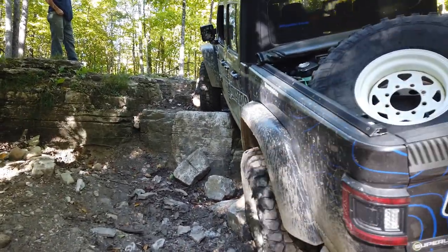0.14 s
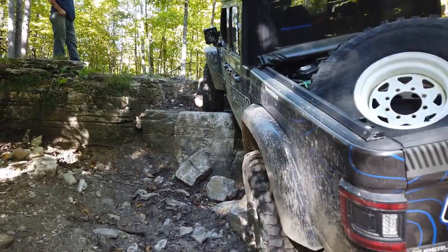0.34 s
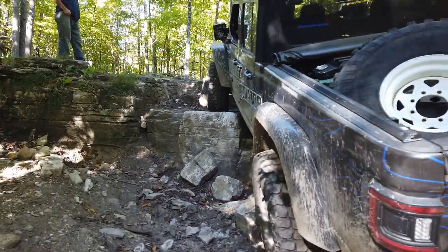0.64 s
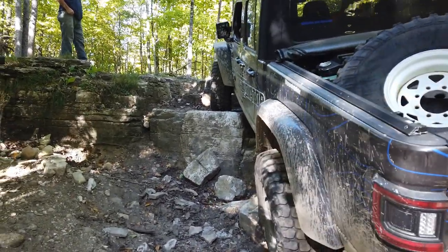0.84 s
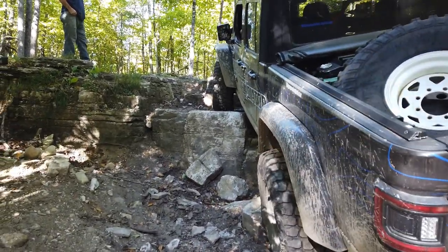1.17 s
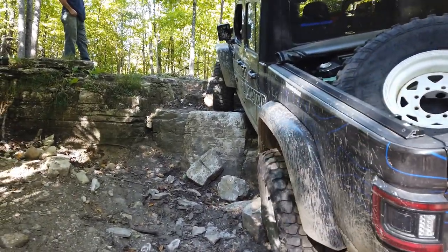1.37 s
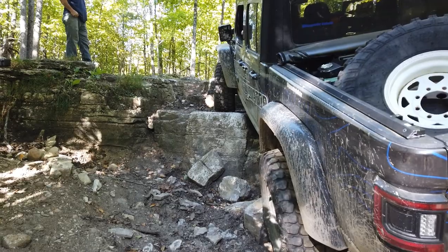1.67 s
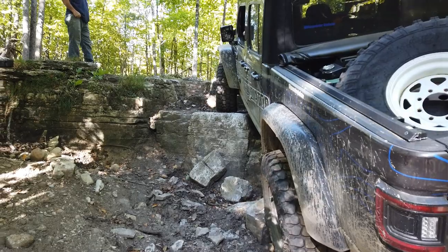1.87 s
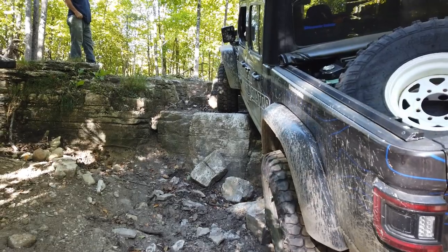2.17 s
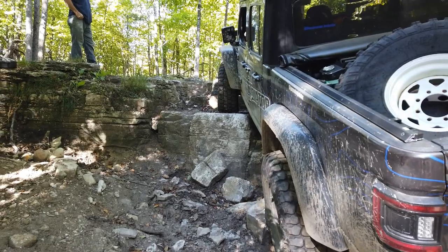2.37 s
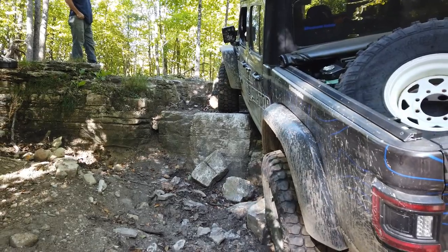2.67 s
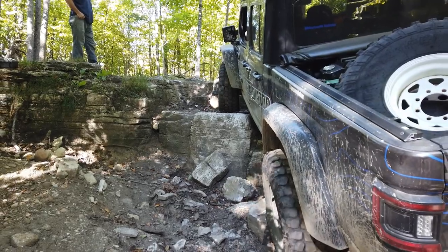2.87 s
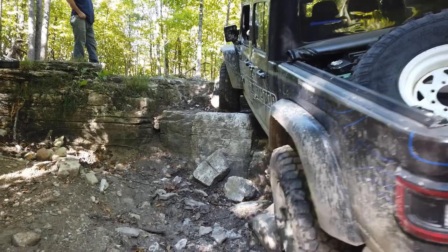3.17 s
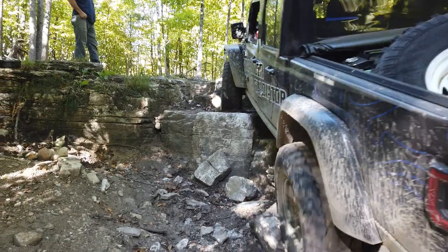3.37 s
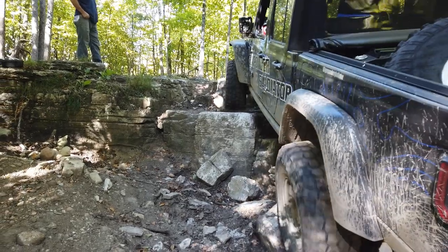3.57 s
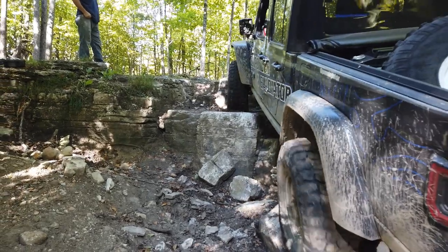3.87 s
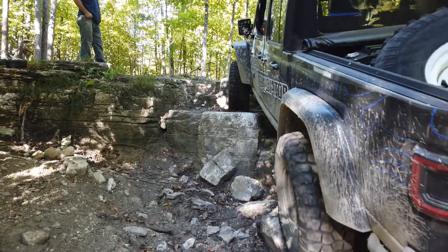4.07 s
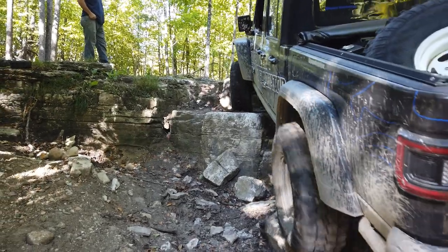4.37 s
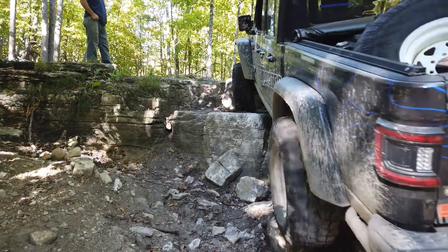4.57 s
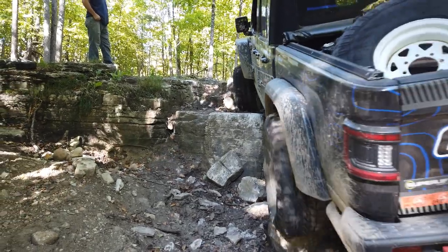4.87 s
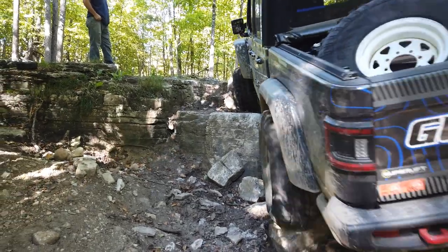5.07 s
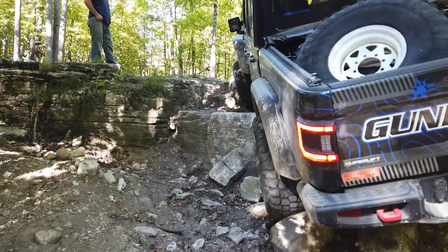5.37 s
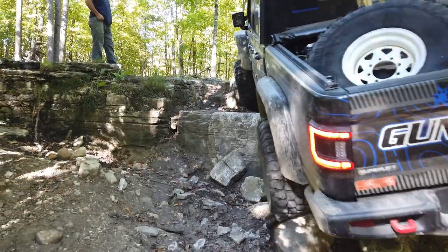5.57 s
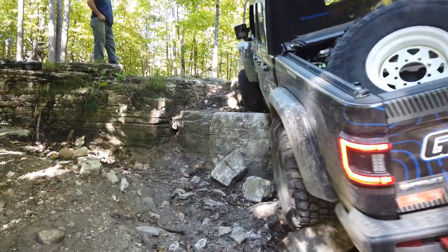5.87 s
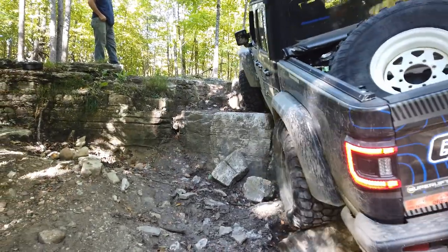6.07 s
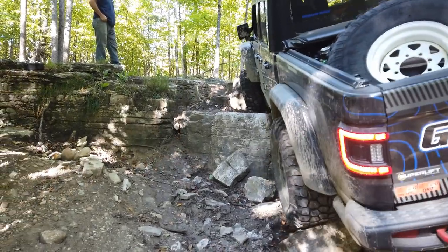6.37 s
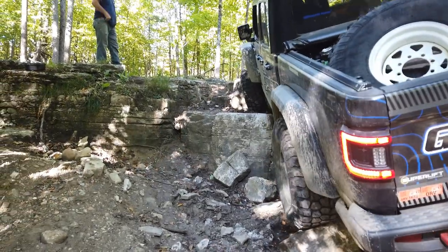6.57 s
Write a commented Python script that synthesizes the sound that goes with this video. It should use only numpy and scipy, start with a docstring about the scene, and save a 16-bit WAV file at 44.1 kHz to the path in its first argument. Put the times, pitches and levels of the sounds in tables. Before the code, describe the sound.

Outdoors among trees, close behind a truck on a rock ledge, with faint steady forest air beneath. In the first 0.8 seconds stones knock, click and crunch under the tyres over a low idle. The exhaust swells quickly, peaking around 0.8 to 1.2 seconds with metallic chatter, then sinks to a slow throb near 1.8. It pulls up again, ticking brightly around 2.3 to 2.6, and grows loud by 2.7. From about 2.9 the tyres slip and grind, scattering grit and dirt; revs climb to a raspy growl through 3.9, with body thuds near 3.5, ease around 4.5 amid stone cracks and tiny squeaks, then surge again at 5 to 5.3. At 5.4 the throttle closes; loudness drops, a thud lands near 5.75, and the uneven engine winds down with rubbing brakes, a faint thin whine near 6.2 and last stones crunching until 6.7.

```python
"""Truck climbing a rock ledge

A six-cylinder truck crawls up a rock ledge on a wooded trail, heard from close behind, then rolls back.
The exhaust, a sum of engine orders shaped by the pipe, swells from idle twice; filtered noise and ringing
modes add its rasp, chatter and pinging. On the long second push the tyres spin, grind on stone and spray
dirt, all as coloured random clicks. Stones crunch as noise bursts; knocks, ticks and brief squeaks ring as
decaying modes, the body thuds, the brakes rub and whine as the throttle closes, and steady noise forms
the forest."""
import sys
import numpy as np
from scipy import signal
from scipy.fft import rfft, irfft
from scipy.io import wavfile
from scipy.ndimage import uniform_filter1d

SR = 44100
rng = np.random.default_rng(int(sys.argv[2]) if len(sys.argv) > 2 else 0)


def put_to_file(sound):
    """Save the sound as 16-bit audio at rate SR, in the file named by the first command-line argument."""
    columns = np.atleast_2d(sound).T  # one column per channel
    safe = np.clip(columns, -1, 1)
    whole_steps = np.round(safe * 32767)
    wavfile.write(sys.argv[1], SR, whole_steps.astype(np.int16))


N = 296352
TIME = np.arange(N) / SR  # s

# Spectrum of still air and leaves: frequency_hz, relative_level_db
FOREST_COLOUR = [(500, -7), (680, 7.5), (1000, -3), (1800, 0), (2600, 3), (3500, -7.5), (7000, -10),
                 (10400, -13.5), (12000, -45), (16000, -32.5)]
# Likeness of left and right: frequency_hz, correlation (no unit)
LEFT_RIGHT_LIKENESS = [(30, 0.95), (300, 0.95), (700, 0.94), (1400, 0.83), (2800, 0.64), (5000, 0.067),
                       (16000, 0.22)]
# Stones crunching under the wheels: start_s, level_db (before a common gain), centre_hz, length_s
STONE_CRUNCHES = [(0.088, -33, 950, 0.016), (0.355, -42, 1720, 0.023), (0.433, -45, 1490, 0.024),
                  (0.519, -47, 1190, 0.02), (0.563, -39.5, 1650, 0.022), (0.600, -39, 2400, 0.013),
                  (0.627, -44, 2040, 0.015), (0.753, -41, 950, 0.014), (1.483, -59, 2000, 0.0064),
                  (1.6378, -51, 1570, 0.0074), (2.614, -47, 1780, 0.023), (2.969, -44, 720, 0.047),
                  (2.992, -33.5, 603, 0.075), (3.144, -40, 1610, 0.031), (3.207, -39.5, 666, 0.044),
                  (3.431, -37.5, 1660, 0.014), (3.504, -40, 1540, 0.032), (3.54, -39.5, 1680, 0.027),
                  (3.672, -41, 1410, 0.032), (3.724, -42.5, 2150, 0.066), (3.92, -43, 1460, 0.014),
                  (4.415, -33, 452, 0.047), (4.643, -35.5, 765, 0.042), (4.648, -47, 1980, 0.026),
                  (4.723, -36.5, 1200, 0.028), (4.83, -40, 1540, 0.011), (4.879, -41, 960, 0.069),
                  (5.408, -45, 1590, 0.024), (5.48, -45.5, 1730, 0.083), (5.568, -38.5, 2020, 0.026),
                  (5.703, -42.5, 1900, 0.032), (6.017, -40, 715, 0.044), (6.023, -41, 2020, 0.032),
                  (6.086, -44, 1140, 0.018), (6.181, -43.5, 2070, 0.025), (6.384, -52, 2000, 0.025),
                  (6.456, -38.5, 370, 0.029), (6.604, -59, 2000, 0.054), (6.665, -52, 1070, 0.022)]
# Short ringing sounds: stone knocks, pebble ticks, brief squeaks near 3.3 kHz and the bright start of a hiss:
# start_s, peak_db, pitch_hz, decay_s
SHORT_RINGS = [(0.0335, -26, 1440, 0.0051), (0.0345, -20, 840, 0.0017), (0.042, -20.5, 1000, 0.0022),
               (0.078, -21, 1206, 0.0037), (0.0852, -15.5, 932, 0.003), (0.192, -30, 1990, 0.0013),
               (0.247, -32.5, 1950, 0.0011), (0.5623, -17, 1580, .0007), (0.5996, -22, 2150, 0.00077),
               (0.604, -26.5, 2640, 0.0058), (0.627, -30, 2090, 0.0011), (0.653, -40, 5400, .003),
               (0.7363, -30.5, 1930, 0.0018), (0.753, -34, 1200, 0.0014), (3.145, -25.5, 1700, 0.0015),
               (3.207, -20.5, 674, 0.0038), (3.433, -41, 7950, .002), (3.442, -25.5, 1540, .002),
               (3.852, -42, 7800, .004), (3.894, -26.5, 1880, 0.006), (4.16, -46, 9900, 0.0032),
               (4.301, -48, 8300, 0.0032), (4.532, -38.5, 3210, 0.016), (4.576, -41, 3310, 0.007),
               (4.655, -38, 1300, 0.0019), (4.737, -26, 1310, 0.0062), (4.836, -39, 3300, 0.0071),
               (4.9945, -23.5, 1500, .001), (5.476, -36, 4900, 0.004), (5.49, -34, 5370, 0.0024),
               (5.575, -36, 2070, 0.0026), (6.025, -35, 1500, 0.0013)]
# Modes of each short ring: multiple of its pitch (no unit), relative_level_db
RING_MODES = [(.76, -1), (0.999, 3.5), (1.65, -15), (2.05, -12)]
# Axle and body thud as a wheel drops: start_s, peak_db, pitch_hz, decay_s
BODY_THUDS = [(3.48, -18.5, 225, 0.0058), (3.636, -18.5, 220, 0.0081), (3.655, -20, 65.4, 0.011),
              (5.722, -25, 48, 0.036), (5.782, -19, 147, 0.0082), (6.022, -30, 250, 0.0033)]
# A tyre rolls hard or spins on the rock: start_s, attack_s, length_s, grinding_db, spray_db, rumble_db
TYRE_SLIPS = [(0, 0.012, 0.093, -46.5, -66.5, -29), (0.108, 0.025, .16, -46.5, -64, -41),
              (0.315, 0.0067, 0.063, -44, -48.5, -31), (0.547, .005, 0.15, -49, -55, -39),
              (2.884, 0.13, 3.37, -46.5, -62.5, -35), (3.037, 0.08, 0.44, -44, -57.5, -30),
              (3.419, 0.0072, .02, -37, -49.5, -27.5), (3.487, 0.015, 0.44, -38.5, -52, -31),
              (3.66, 0.061, 0.1, -40, -48, -37), (4.484, 0.031, 0.059, -38.5, -52.5, -52),
              (4.602, 0.031, 0.17, -39, -54.5, -53), (4.776, 1, 0.55, -47, -49, -38),
              (5.463, 0.025, 0.012, -39, -43, -56), (5.526, 0.036, 0.04, -51, -49.5, -49),
              (5.691, 0.015, 0.085, -41.5, -49, -35), (5.847, 0.045, 0.24, -41, -52.5, -44),
              (6.102, 0.052, 0.094, -57, -56.5, -34), (6.335, 0.0079, 0.051, -48, -60.5, -30.5)]
# Spectrum of tread grinding on rock: frequency_hz, relative_level_db
GRIND_COLOUR = [(200, -36.5), (390, 12.5), (470, 6), (700, 4.5), (1000, -4), (1300, -2.5), (1700, -6.5),
                (2300, -2.5), (2850, -9), (3600, -23.5), (6000, -40), (12000, -46.5)]
# Spectrum of flying dirt: frequency_hz, relative_level_db
SPRAY_COLOUR = [(1500, -17.5), (3300, -3), (4400, 1), (5400, 3), (7000, -0.5), (9000, 0), (10400, 3.5),
                (11400, -10), (13000, -14.5), (15000, -7), (16000, -33)]
# Spectrum of tread and chassis rumble: frequency_hz, relative_level_db
RUMBLE_COLOUR = [(15, -14), (30, 0.5), (50, 7.5), (80, -0.5), (110, -7.5), (150, -5), (185, -3.5),
                 (220, -6), (265, -10.5), (290, -1.5), (325, -12.5), (400, -32), (480, -32.5), (900, -78)]
# Spectrum of ticking under load: frequency_hz, relative_level_db
PING_COLOUR = [(1800, -28), (2500, 1), (3350, -1), (3800, -24), (5100, -9), (6500, -32)]
# Metallic modes of the engine chatter: frequency_hz, relative_level_db, t60_s
CHATTER_MODES = [(618, 1.5, 0.036), (800, 2, 0.022), (944, -3, 0.024), (1413, 0, 0.015), (1790, -9, 0.018),
                 (2190, -10, 0.025), (2493, -2.5, 0.021), (2733, -6, 0.032), (3130, -20, 0.02),
                 (3750, -25, 0.0072), (5150, -25, 0.018)]
# Level of the chatter, strongest as the engine pulls up from idle: time_s, level_db
CHATTER_LEVEL = [(0, -60), (.55, -49.5), (.9, -45), (1.1, -53), (1.35, -74.5), (1.8, -59), (2.15, -69),
                 (2.5, -52.5), (2.85, -38.5), (3.1, -46.5), (3.45, -58), (4.25, -55), (5.1, -46.5),
                 (5.5, -55), (6.3, -56), (6.55, -72)]
# Spectrum of gas rushing from the tailpipe: frequency_hz, relative_level_db
RASP_COLOUR = [(150, -31), (300, 7), (400, 5.5), (490, -2.5), (580, 5), (690, 3.5), (830, -5.5),
               (1000, -12), (1220, -10), (1450, -14.5), (2000, -13.5), (4000, -49)]
# Engine speed, three firings a revolution: time_s, firing_rate_hz
ENGINE_SPEED = [(0, 32), (.43, 29.1), (.88, 46.3), (1.02, 60.6), (1.22, 61.6), (1.6, 42.4), (1.81, 25.3),
                (2.2, 29.5), (2.5, 36.1), (2.8, 50.2), (2.9, 61.3), (3.32, 89.6), (3.6, 98), (3.92, 103.5),
                (4.2, 95.7), (4.5, 83.6), (4.99, 83.3), (5.32, 106.8), (5.8, 101), (6.3, 77), (6.55, 59),
                (6.72, 54)]
# Loudness of the exhaust: time_s, level_db (before a common gain)
EXHAUST_LOUDNESS = [(0.0, -24.5), (0.03, -36.5), (0.22, -33.5), (0.78, -13), (0.88, -12.5), (1.31, -24.3),
                    (1.58, -24), (1.76, -37.5), (1.87, -27.5), (2.41, -20.5), (2.71, -11), (3.01, -17),
                    (3.29, -12.5), (3.42, -21.5), (3.52, -20), (4.25, -23), (4.45, -16.5), (4.9, -15),
                    (5.05, -11.5), (5.33, -22), (5.5, -34.5), (5.67, -35), (5.73, -22.5), (6.2, -20.5),
                    (6.53, -30.5), (6.72, -31)]
# Response of the exhaust pipe and muffler: frequency_hz, gain_db
PIPE_RESPONSE = [(25.0, -7.5), (36.0, 3.5), (48.0, 10), (66.0, 0.5), (86.0, 4.5), (104.0, -11.5),
                 (155.0, -6), (178.0, -24), (212.0, -17.5), (250.0, -12.5), (305.0, -29.5), (335.0, -33.5),
                 (368, -34.5), (405, -61), (490, -64), (560, -70.5), (630, -63), (760, -74)]
# Sharpness of the exhaust pulses, as the tilt of their orders: time_s, tilt_db_per_octave
PULSE_SHARPNESS = [(0, 10), (.45, 4.5), (.9, 3), (1.0, 4), (1.22, 7.5), (1.6, 3.5), (2.85, 2), (3.15, 6.5),
                   (3.45, 0.5), (3.7, 6), (4.4, 7), (5.03, 2.5), (5.3, 4.5), (5.5, 4.5), (6.72, 3.5)]
# Imbalance of the two cylinder banks, a lope on every second firing: time_s, level_db
BANK_LOPE = [(0, -16), (.8, -27.5), (1.4, -34), (2.3, -18), (3.0, -14.5), (3.5, -19), (4.15, -17),
             (4.6, -24), (5.38, -24.5), (5.5, -6.5), (6.72, -2.5)]

MID_RATE, MID_DB = 60, -20  # an ordinary speed (firings per s) and exhaust loudness (dB)
SHUT_S, SHUT_FADE_S = 5.4, 0.077  # the throttle closes and the engine coasts from here on
SLIP_RELEASE_S = 0.098
EDGE_HZ = 15800  # upper limit of the band


def amp(db):
    """Level definition: decibels to an amplitude gain."""
    return 10 ** (np.asarray(db) / 20)


def evened(x):
    """Power normalization: scales to rms 1."""
    return x / np.sqrt(np.mean(x ** 2) + 1e-20)


def curves(rows, t=TIME):
    """Linear interpolation: the columns of a table, joined by straight lines in time."""
    s, *columns = np.transpose(rows)
    return [np.interp(t, s, c) for c in columns]


def read(points, hz):
    """Logarithmic frequency scale: a spectrum, joined by straight lines over log frequency."""
    f, value = np.transpose(points)
    return np.interp(np.log(hz + 1), np.log(f + 1), value)


def add(mix, s, sound):
    """Superposition: mixes a sound in at time s."""
    part = mix[:, max(round(s * SR), 0):][:, :sound.shape[1]]
    part += sound[:, :part.shape[1]]


def wander(hz, size=N, rate=SR):
    """Low-passed random process: a slow fluctuation of rms 1, mostly below hz."""
    lowpass = 1 / (1 + (np.fft.rfftfreq(size, 1 / rate) / hz) ** 4)
    return evened(irfft(rfft(rng.standard_normal(size)) * lowpass, size))


def causal(points):
    """Minimum phase: frequencies and complex log gain of the causal filter with this spectrum."""
    hz = abs(np.fft.fftfreq(16384, 1 / SR))
    log_gain = signal.hilbert(np.log(amp(read(points, hz)))).conj()
    half = len(hz) // 2 + 1
    return hz[:half], log_gain[:half]


def coloured(x, points):
    """Linear filtering: two channels through a causal filter, rms 1."""
    response = irfft(np.exp(causal(points)[1]))[None, :SR // 8]
    return evened(signal.oaconvolve(x, response, axes=1)[:, :N])


def spread(pair):
    """Interaural coherence: a centre and a diffuse signal become left and right, alike in the bass."""
    same = np.clip(read(LEFT_RIGHT_LIKENESS, np.fft.rfftfreq(N, 1 / SR)), -1, 1)
    mid, side = irfft(rfft(pair) * np.sqrt([(1 + same) / 2, (1 - same) / 2]), N)
    return np.array([mid + side, mid - side])


def grains(per_s, spread_db):
    """Shot noise: random clicks, mostly small and a few large."""
    size = amp(spread_db * np.minimum(rng.exponential(1, (2, N)), 4))
    sign = rng.choice([-1, 1], (2, N))
    return evened(size * sign * (rng.random((2, N)) < per_s / SR))


def patchy(x, depth_db):
    """Time-frequency modulation: clumps a few hundred Hz wide and tens of ms long; the bass stays even."""
    hz, _, z = signal.stft(x, SR, nperseg=512)
    patches = uniform_filter1d(rng.standard_normal(z.shape[1:]), size=4, axis=0)
    patches = uniform_filter1d(patches, size=5, axis=1)
    depth = depth_db * np.minimum(hz / 1000, 1)[:, None]
    return evened(signal.istft(z * amp(depth * evened(patches)), nperseg=512)[1][:, :N])


def follow(db, octave_db=0, pull_db=0, swell_db=0, coast_db=0):
    """Load dependence: a level in dB that follows engine speed, acceleration, loudness and coasting."""
    octaves = np.log2(curves(ENGINE_SPEED)[0] / MID_RATE)
    pull = uniform_filter1d(np.gradient(octaves) * SR, size=SR // 6)  # octaves per s
    swell = (curves(EXHAUST_LOUDNESS)[0] - MID_DB) / 10  # steps of 10 dB
    coast = np.clip((TIME - SHUT_S) / SHUT_FADE_S, 0, 1)
    return db + octave_db * octaves + pull_db * pull + swell_db * swell + coast_db * coast


def firings(turns):
    """Periodic excitation: the number of the current firing, and one click as each starts."""
    number = np.floor(turns - np.floor(turns[0])).astype(int)
    # the height keeps the power of the clicks equal at every speed
    return number, np.diff(number, prepend=0) * np.sqrt(SR / curves(ENGINE_SPEED)[0])


def bursts(turns, burst_s, weak_bank_db, lead_s=0.0059):
    """Impulsive modulation: a short swell at every firing; at low speed one bank hits harder."""
    rate, = curves(ENGINE_SPEED)
    turns = turns + lead_s * rate
    number, _ = firings(turns)
    age = turns % 1 / rate / burst_s
    size = amp(weak_bank_db * (number % 2) * MID_RATE / rate)
    return size * age * np.exp(1 - age)


def forest():
    """Ambient noise: still air and leaves make a steady, coloured random signal."""
    return amp(-62.5) * coloured(rng.standard_normal((2, N)), FOREST_COLOUR)


def brakes():
    """Friction: pads rub faintly on the discs as the truck is held, and briefly whine in a resonance."""
    rub_db, rub_hz, stage_width_hz = -58, 2850, 600
    start_s, stop_s, fade_s = 5.4, 6.3, .17
    whine_db, whine_hz, whine_s, whine_length_s = -54, 2835, 6.2, 0.18
    b, a = signal.iirpeak(rub_hz, rub_hz / stage_width_hz, fs=SR)
    once = signal.lfilter(b, a, rng.standard_normal((2, N)))
    rub = evened(signal.lfilter(b, a, once))
    fade_in = np.clip((TIME - start_s) / fade_s, 0, 1)
    fade_out = np.clip((stop_s - TIME) / fade_s + 1, 0, 1)
    out = amp(rub_db) * rub * fade_in * fade_out
    pitch_hz = whine_hz * (1 + .012 * wander(90))
    whine = np.sin(2 * np.pi * np.cumsum(pitch_hz) / SR) * (1 + .4 * wander(40))
    out[0] += amp(whine_db) * whine * np.exp(-((TIME - whine_s) / whine_length_s) ** 2)
    return out


def short_rings(echo_db=-8, echo_s=0.02):
    """Modal decay: knocks, ticks, brief squeaks and a hiss onset ring and die; the rocks scatter them back."""
    out, t = np.zeros((2, N)), TIME[:SR // 8]
    rise_cycles = .3
    for s, db, hz, decay in SHORT_RINGS:
        ring = np.zeros(len(t))
        for k, mode_db in RING_MODES:
            mode = amp(mode_db) * np.sin(2 * np.pi * k * hz * t) * np.exp(-k * t / decay)
            ring += mode / (1 + (k * hz > 3000) * abs(k - 1) * 10)  # side modes are weak in the treble
        ring *= 1 - np.exp(-(hz * t / rise_cycles) ** 2)
        paths = rng.standard_normal((2, len(t))) * np.sqrt(t) * np.exp(-t / echo_s)
        paths *= amp(echo_db) / np.linalg.norm(paths[0])
        paths[0, 0] += 1  # the direct sound, in the centre
        add(out, s, amp(db) * signal.fftconvolve(paths, ring[None] / abs(ring).max(), axes=1))
    return out


def stones(gain_db=1.5, octaves=0.67, tail_db=-23):
    """Granular contact: a stone grinds against its neighbours in a burst of band-limited chips."""
    out, t = np.zeros((2, N)), TIME[:SR // 5]
    top_hz, chips_per_s, chip_db = 2900, 1100, 3
    rise_s, dust, tail_s = .0007, .07, .1  # dust is the noise floor between chips
    for s, db, hz, length in STONE_CRUNCHES:
        sign = rng.choice([-1, 1], (2, len(t)))
        chips = sign * (dust + (rng.random((2, len(t))) < chips_per_s / SR))
        chips = chips * amp(chip_db * rng.standard_normal(chips.shape))
        edges = [hz / 2 ** octaves, min(hz * 2 ** octaves, top_hz)]
        band = signal.butter(3, edges, "bandpass", fs=SR, output="sos")
        crunch = evened(signal.sosfilt(band, chips))
        fade = np.exp(-(t / max(length, .002)) ** 2)
        fade += amp(tail_db) * np.exp(-t / tail_s)  # the ledge returns a short tail
        add(out, s, amp(db + gain_db) * crunch * fade * (1 - np.exp(-t / rise_s)))
    return out


def thuds():
    """Damped resonance: a soft blow swells a low panel mode, which dies within a few cycles."""
    out, t = np.zeros((2, N)), TIME[:SR // 4]
    for s, db, hz, decay in BODY_THUDS:
        swell = t / decay * np.exp(1 - t / decay)
        add(out, s, (amp(db) * swell * np.sin(2 * np.pi * hz * t))[None])
    return out


def slips():
    """Stick and slip: gains of grinding, spray and rumble build, hold, and die as the tread grips again."""
    power = np.zeros((3, N))
    for s, attack, length, grind_db, spray_db, rumble_db in TYRE_SLIPS:
        t = np.maximum(TIME - s, 0)
        build = np.minimum(t / max(attack, .002), 1)
        release = np.exp(-np.maximum(t - length, 0) / SLIP_RELEASE_S)
        power += (amp([[grind_db], [spray_db], [rumble_db]]) * build * release) ** 2
    return np.sqrt(power)


def tyres(clump_db=1.5, spray_clump_db=1, lump_db=-0.5):
    """Frictional impacts: tread catches and slips; grit cracks in clumps, dirt sprays, the chassis rumbles."""
    slip_grind, slip_spray, slip_rumble = slips()
    # powers of slipping and of rolling add
    grinding = np.hypot(slip_grind, amp(follow(db=-63.5, octave_db=1.5, swell_db=3)))
    spraying = np.hypot(slip_spray, amp(follow(db=-73.5, swell_db=9.0)))
    rolling_rumble = amp(follow(db=-35.5, octave_db=-1.0, swell_db=6.5, coast_db=3.5))
    rumbling = np.hypot(slip_rumble, rolling_rumble)
    grit = patchy(coloured(grains(per_s=3500, spread_db=3.2), GRIND_COLOUR), depth_db=2.3)
    grind = grit * grinding * amp(clump_db * wander(40))
    dirt = coloured(grains(per_s=5400, spread_db=0.5), SPRAY_COLOUR)
    spray = dirt * spraying * amp(spray_clump_db * wander(29))
    lumps = coloured(grains(per_s=1100, spread_db=2.5), RUMBLE_COLOUR)
    rumble = lumps * rumbling * amp(lump_db * wander(2.6))
    return grind + spray + rumble


def pinging(turns, db=-54, start_s=2.25, stop_s=2.64):
    """Gated noise: lugging up from idle, one bank ticks brightly on every second firing."""
    swell = bursts(turns, burst_s=.005, weak_bank_db=-12)
    ticks = swell * coloured(rng.standard_normal((2, N)), PING_COLOUR)
    return amp(db) * ticks * (TIME > start_s) * (TIME < stop_s)


def chatter(turns, low_hz=550):
    """Forced modal vibration: firings shake the exhaust metal in short rattles; gas stirs it in between."""
    t = TIME[:SR // 20]
    steady, burst_s = .27, .0025
    ring = sum(amp(db - 60 * t / t60) * np.sin(2 * np.pi * hz * t) for hz, db, t60 in CHATTER_MODES)
    ring = signal.sosfilt(signal.butter(10, low_hz, "highpass", fs=SR, output="sos"), ring)
    jolts = patchy(rng.standard_normal((2, N)), depth_db=3)  # varies the colour of the rattles
    shake = (steady + bursts(turns, burst_s, weak_bank_db=-3.5)) * jolts
    rattle = evened(signal.oaconvolve(shake, ring[None], axes=1)[:, :N])
    return rattle * amp(curves(CHATTER_LEVEL)[0])


def rasp(turns, puff=1.0, steady=0.86, weak_bank_db=-6):
    """Jet noise: each firing leaves the pipe as a sharp front and a puff of turbulent gas."""
    number, clicks = firings(turns)
    front_share, scatter_db = 1.15, 1.2
    scatter = scatter_db * rng.standard_normal(N // 100)[number]
    fronts = clicks * amp(weak_bank_db * (number % 2) + scatter)
    # puff is the decay in firing periods
    puffs = evened((steady + np.exp(-(turns % 1) / puff)) * rng.standard_normal((2, N)))
    puffs[0] += front_share * evened(fronts)  # the fronts go to the centre signal only
    gusts = patchy(coloured(puffs, RASP_COLOUR), depth_db=2.5)
    return gusts * amp(follow(db=-53.0, octave_db=19, pull_db=2.5, swell_db=3.5, coast_db=-3.5))


def exhaust(turns, gain_db=-1.0, flutter=0.045, growl_db=8, growl_hz=255, growl_rate=62):
    """Fourier series: firing pulses as engine orders through the pipe; uneven cylinders add lines between."""
    step, rough_db, half_flutter = 12, 3.5, .4  # computed at every 12th sample
    t, turns = TIME[::step], turns[::step]
    rate, = curves(ENGINE_SPEED, t)
    sharp_db, = curves(PULSE_SHARPNESS, t)
    bank_db, = curves(BANK_LOPE, t)
    # differences between single cylinders
    uneven_db = follow(db=-30, octave_db=-3.0, swell_db=-2.0, coast_db=8)[::step]
    hz, pipe = causal(PIPE_RESPONSE)
    out, power = np.zeros((2, len(t)))
    for sixth in range(2, 73):  # the pattern repeats every six firings
        order = sixth / 6
        order_hz = order * rate
        tilt = amp(sharp_db * np.log2(max(order, 1)))
        gain = np.exp(np.interp(order_hz, hz, pipe)) * tilt * (order_hz < 1000)
        upper = np.clip((order_hz / growl_hz - 1) * 10, 0, 1)
        # at speed the fronts steepen and growl past the muffler
        gain = gain * amp(growl_db * upper * np.log2(rate / growl_rate))
        if order > 3:  # the upper orders falter irregularly
            gain = gain * amp(rough_db * upper * wander(8.2, len(t), SR / step))
        if sixth % 3:  # lines of single cylinders
            phase = np.exp(2j * np.pi * rng.random())
            gain = gain * amp(uneven_db + 5.74 * np.log2(order)) * phase
        elif sixth % 6:  # half orders of the unequal banks
            gain = gain * amp(bank_db) * (1 + half_flutter * wander(12.8, len(t), SR / step))
        out -= (gain * np.exp(2j * np.pi * order * turns)).real
        power += abs(gain) ** 2 / 2
    level = amp(curves(EXHAUST_LOUDNESS, t)[0] + gain_db) / np.sqrt(power)
    out *= level * (1 + flutter * wander(33, len(t), SR / step))
    return signal.resample_poly(out, step, 1)[:N]


def scene():
    """Superposition of sources: engine, tyres and stones over the quiet of the forest."""
    turns = np.cumsum(curves(ENGINE_SPEED)[0]) / SR + .38  # firing cycles
    ground = forest() + brakes() + short_rings() + stones() + tyres()
    engine_noise = pinging(turns) + chatter(turns) + rasp(turns)
    return spread(ground + engine_noise) + thuds() + exhaust(turns)


def record(dry):
    """Band limitation: a linear-phase low-pass filter removes the highest treble."""
    lowpass = signal.firwin(511, EDGE_HZ, window=("kaiser", 9), fs=SR)
    return signal.oaconvolve(dry, lowpass[None], "same")


dry = scene()
out = record(dry)
put_to_file(out)
```